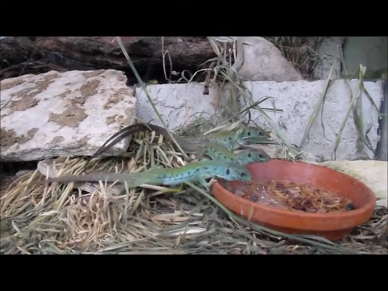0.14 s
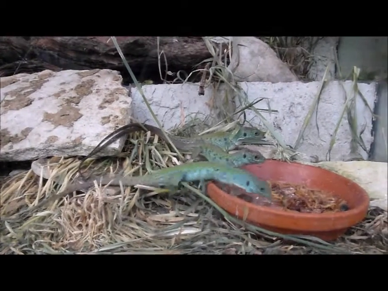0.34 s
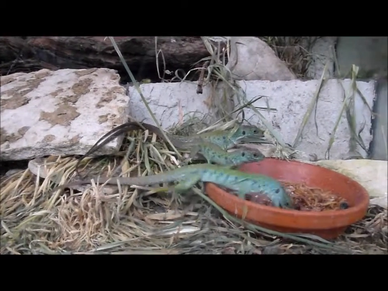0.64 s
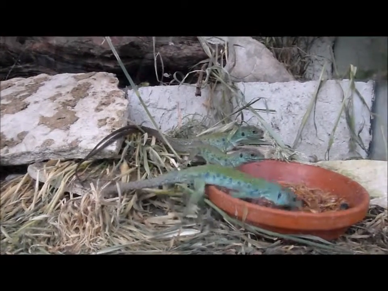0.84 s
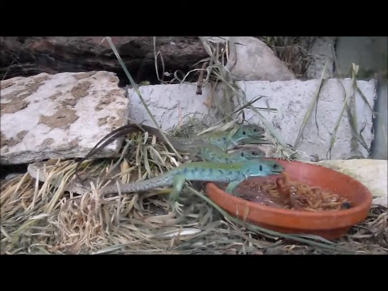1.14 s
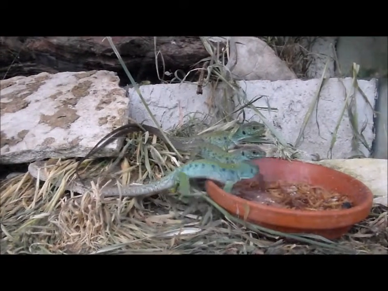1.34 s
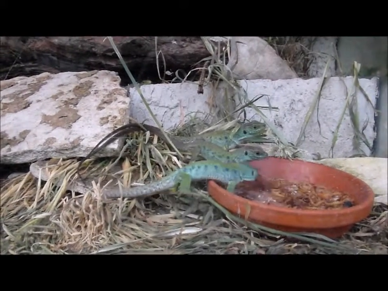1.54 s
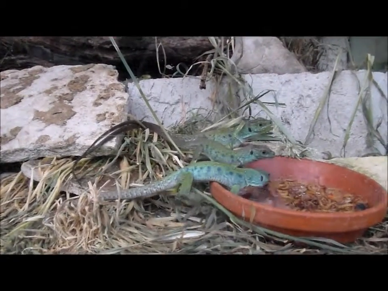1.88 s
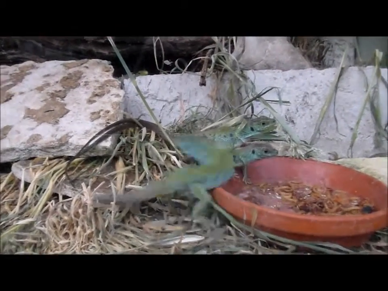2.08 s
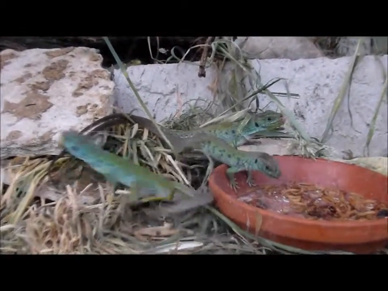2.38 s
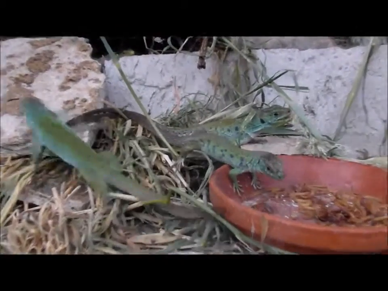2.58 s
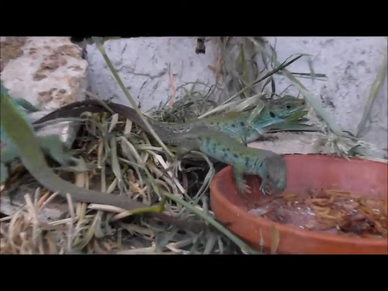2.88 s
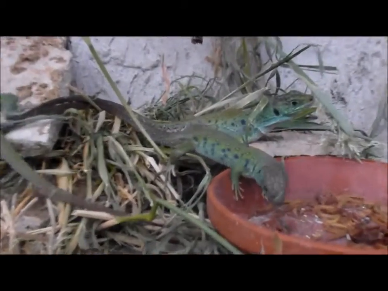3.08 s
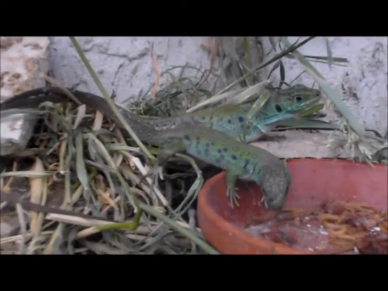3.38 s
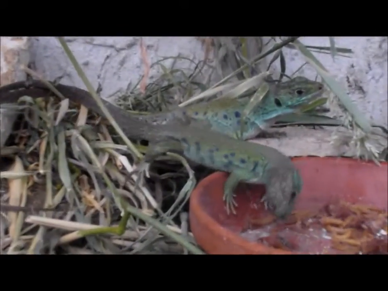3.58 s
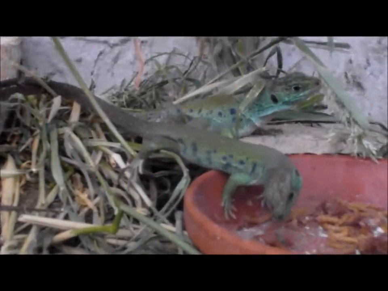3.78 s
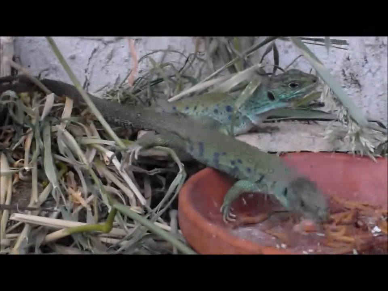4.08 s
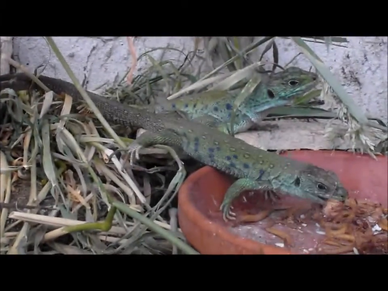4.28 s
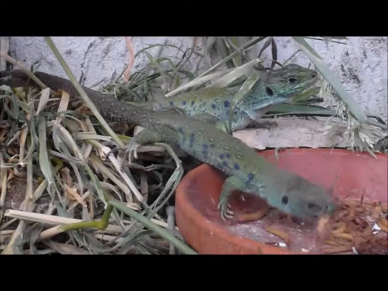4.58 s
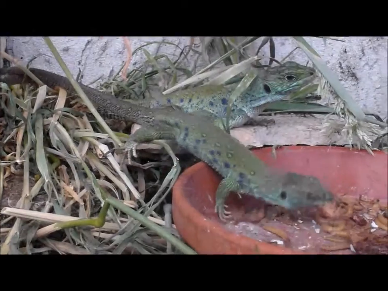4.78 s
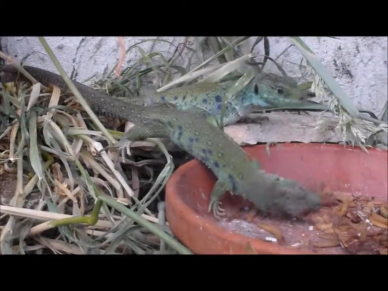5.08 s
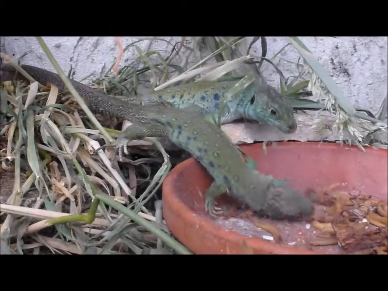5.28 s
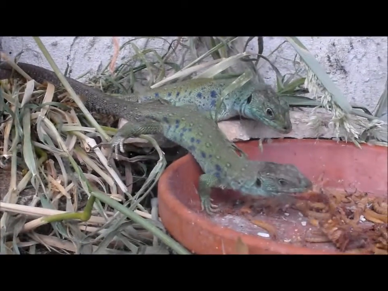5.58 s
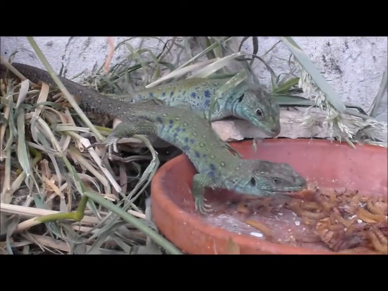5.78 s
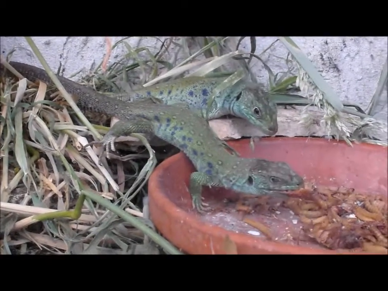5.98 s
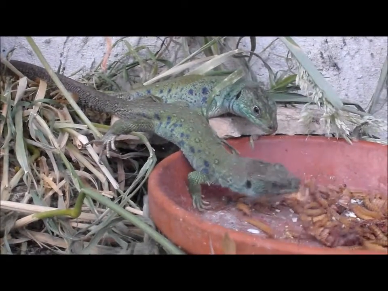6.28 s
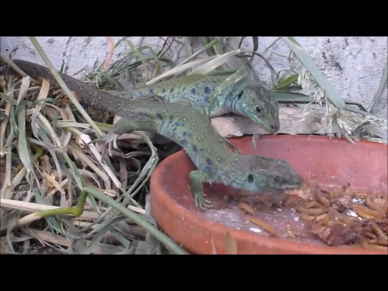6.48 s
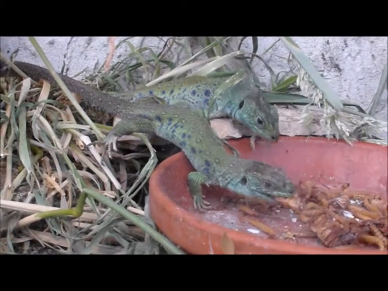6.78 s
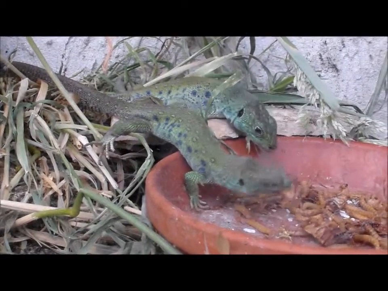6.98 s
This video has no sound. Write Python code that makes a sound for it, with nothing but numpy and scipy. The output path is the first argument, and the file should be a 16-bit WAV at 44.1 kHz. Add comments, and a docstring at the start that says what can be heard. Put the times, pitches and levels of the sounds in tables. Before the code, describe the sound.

Quiet outdoor pen: light sharp taps, a pause, one much louder click, a brief creak, then faint regular barks far away.

```python
"""A quiet outdoor pen: lizards feed from a clay dish close to a hand-held camera.
Sharp dry clicks and taps, ringing modes under a noisy crack, fall in two clusters, one far louder.
Soft puffs of grainy noise, some blurring the clicks, join them; a creak of stick-slip pulses follows.
Then something far off, probably a dog, barks steadily: a pitched, noisy drive through throat bands.
Shaped noise makes the low outdoor murmur and the faint hiss."""
import sys
import numpy as np
from scipy import signal
from scipy.fft import rfft, irfft
from scipy.io import wavfile
from scipy.ndimage import uniform_filter1d

SR = 44100
rng = np.random.default_rng(int(sys.argv[2]) if len(sys.argv) > 2 else 0)


def file_out(sig):
    """Save sig as 16-bit WAV at sys.argv[1]."""
    # one column per channel
    cols = np.atleast_2d(sig).T
    # limit, then scale
    lim = np.clip(cols, -1, 1)
    pcm = np.round(lim * 32767).astype(np.int16)
    wavfile.write(sys.argv[1], SR, pcm)


N = 315196
TIME = np.arange(N) / SR
EDGE_HZ = 11560  # upper band limit


def amp(db):
    """Decibels to gain."""
    return 10 ** (np.asarray(db) / 20)


def evened(x):
    """Scales to rms 1."""
    return x / np.sqrt(np.mean(x ** 2) + 1e-20)


def smooth_noise(size, width):
    """Slow random curve of rms 1: white noise averaged over width samples."""
    return evened(uniform_filter1d(rng.standard_normal(size), width))


def read(points, hz):
    """Reads a spectrum on a log-frequency axis."""
    point_hz, value = np.transpose(points)
    return np.interp(np.log(hz + 1), np.log(point_hz + 1), value)


def follow(rows, t, axis=1):
    """Reads one column of a curve at the times t."""
    rows = np.asarray(rows)
    return np.interp(t, rows[:, 0], rows[:, axis])


def coloured(x, gain):
    """Filters x by a gain that is a function of frequency."""
    size = x.shape[-1]
    return irfft(rfft(x) * gain(np.fft.rfftfreq(size, 1 / SR)), size)


def hump(centre_hz, octaves):
    """Bell-shaped gain around one frequency; octaves is its standard deviation."""
    return lambda hz: np.exp(-.5 * (np.log2((hz + 1) / centre_hz) / octaves) ** 2)


def bell(t, centre_s, width_s):
    """Bell-shaped envelope in time; width_s is its standard deviation."""
    return np.exp(-.5 * ((t - centre_s) / width_s) ** 2)


def sides(pan_db):
    """Left and right gains, pan_db apart, whose mean is 1."""
    left = np.atleast_1d(amp(pan_db))
    return np.array([left, np.ones_like(left)]) * 2 / (1 + left)


def add(mix, s, sound):
    """Mixes a stereo sound in at s seconds."""
    part = mix[:, max(round(s * SR), 0):][:, :sound.shape[1]]
    part += sound[:, :part.shape[1]]


def dying(noise, t60, t):
    """Lets each band of a noise die at its own speed from time 0 of t."""
    hz, frames, z = signal.stft(noise, SR, nperseg=256)
    fade = amp(-60 * np.maximum(frames + t[0], 0) / read(t60, hz)[:, None])
    return signal.istft(z * fade, SR, nperseg=256)[1][..., :len(t)]


def echoes(x, t60, likeness=0.7):
    """Diffuse outdoor tail: convolution with dying noise, scaled to energy 1 on the right."""
    t = np.arange(SR) / SR
    taps = rng.standard_normal((2, SR))
    taps[0] = likeness * taps[1] + np.sqrt(max(1 - likeness ** 2, 0)) * taps[0]
    tail = dying(taps, t60, t) * np.minimum(t / 0.0035, 1)
    return signal.fftconvolve(x, tail / np.linalg.norm(tail[1]), axes=1)[:, :N]


# microphone hiss spectrum: (frequency [Hz], relative density [dB])
HISS_SPECTRUM = [(30, -6.5), (300, -4), (1200, 3), (2000, 1.5), (3200, 1.5), (4500, -4.5), (6000, -6.5),
                 (9500, -8), (10300, -3), (11500, -4.5)]
# hiss before the common offset: (time [s], level outside 4-10 kHz [dB], gain of 4-10 kHz [dB])
HISS_CURVE = [(0, -72.5, -67), (2.6, -70, -69.5), (7.15, -74.5, -70.5)]
# stretches of dull hiss: (start [s], end [s])
DULL_STRETCHES = [(1.05, 1.314), (3.72, 6.025)]
DULL_DB, DULL_FADE_S = -8, 0.035


def hiss(level_db=3.0, rumble_db=-78):
    """Unrelated left/right hiss whose treble thins at times; a faint rumble swells as the camera moves."""
    spectrum = lambda hz: amp(read(HISS_SPECTRUM, hz)) * (hz < EDGE_HZ)
    noise = evened(coloured(rng.standard_normal((2, N)), spectrum))
    treble = coloured(noise, lambda hz: (hz > 4000) & (hz < 10000))
    dull = sum(np.clip(np.minimum(TIME - start, end - TIME) / DULL_FADE_S + .5, 0, 1)
               for start, end in DULL_STRETCHES)
    rest_gain = amp(follow(HISS_CURVE, TIME))
    treble_gain = amp(follow(HISS_CURVE, TIME, axis=2) + DULL_DB * dull)
    air = (noise - treble) * rest_gain + treble * treble_gain
    rumble = evened(coloured(rng.standard_normal((2, N)), hump(55, 0.51))) * bell(TIME, 2.1, 1.0)
    return amp(level_db) * air + amp(rumble_db) * rumble


# outdoor murmur spectrum: (frequency [Hz], relative density [dB])
MURMUR_SPECTRUM = [(25, -17), (100, -12.5), (200, -22.5), (320, -10), (430, -1), (660, 1), (850, -2),
                   (990, -3.5), (1090, -21.5), (2000, -37)]
# murmur before the offsets: (time [s], wash level [dB], low drone level [dB])
MURMUR_CURVE = [(0.0, -65.5, -82), (0.44, -65.5, -80.5), (0.75, -66, -68), (1.07, -64.5, -82),
                (1.59, -67, -80.5), (2.55, -62.5, -67), (3.6, -66.5, -80), (4.4, -63, -82.5),
                (4.76, -64.5, -74), (6.67, -66, -80), (6.85, -66, -70), (7.15, -66, -77)]
# murmur balance: (frequency [Hz], left minus right [dB])
MURMUR_BALANCE = [(60, -2.5), (150, -2), (350, -11.5), (650, -13.5), (1100, -9.5)]
# left-right likeness of the wash: (frequency [Hz], correlation [0-1])
MURMUR_LIKENESS = [(60, 0.71), (270, 1), (580, 0.3), (1200, .85)]


def murmur(drone_hz=280, drone_octaves=0.56, waver_db=0.5, wash_db=0.87, drone_db=2):
    """Far outdoor noise, mostly from the right, with a low noise drone that comes and goes."""
    common, other, drone_noise = rng.standard_normal((3, N))
    same = lambda hz: np.clip(read(MURMUR_LIKENESS, hz), 0, 1)
    unlike = lambda hz: np.sqrt(1 - same(hz) ** 2)
    pair = np.array([coloured(common, same) + coloured(other, unlike), common])
    wash = evened(coloured(pair, lambda hz: amp(read(MURMUR_SPECTRUM, hz))))
    wash = wash * amp(follow(MURMUR_CURVE, TIME) + wash_db)
    drone = evened(coloured(drone_noise, hump(drone_hz, drone_octaves)))
    drone = drone * amp(follow(MURMUR_CURVE, TIME, axis=2) + drone_db)
    waver = evened(coloured(rng.standard_normal(N), hump(4.8, 0.87)))
    wavering = (wash + drone) * amp(waver_db * waver)
    return coloured(wavering, lambda hz: sides(read(MURMUR_BALANCE, hz)))


# far barks: (peak time [s], level [dB], throat [Hz], lead-in [s], rasp against voice [dB])
FAR_BARKS = [(4.299, -63, 860, 0.049, -6.5), (4.612, -56, 887, 0.043, -15), (4.965, -57.5, 897, 0.052, -11),
             (5.368, -51, 926, .066, -16.5), (5.795, -60, 723, 0.061, -5.5), (6.207, -55, 860, 0.046, -9),
             (6.67, -62, 848, .04, -10), (7.125, -62, 1000, .03, -7.5)]
BARK_DB = -58  # ordinary bark
LEAD_DB, LEAD_SLOPE = -3, 0.55  # lead-in against an ordinary peak; its loss per dB of a louder peak
BOOM_DB, BOOM_SLOPE = -68, 0.76  # rolling echo of an ordinary bark; its gain per dB of a louder one


def barks(pitch_hz=470, rough=0.78, peak_s=0.01405, throat_octaves=0.28, tail_db=-4,
          boom_hz=280, boom_s=0.077, lead_rise_s=0.009, rasp_grain=0.42):
    """Each far bark leads in, peaks with a rasp as the mouth opens, and rolls away as a low echo."""
    out, boom = np.zeros((2, N)), np.zeros((2, N))
    t = np.arange(-SR // 8, SR // 4) / SR
    upper_throat = lambda hz: hump(3100, 0.26)(hz) + amp(3.0) * hump(1900, .4)(hz)
    for s, db, throat_hz, lead_s, rasp_db in FAR_BARKS:
        louder_db = db - BARK_DB
        opening = bell(t, 0, peak_s * np.where(t < 0, .6, 1.3))  # opens faster than it shuts
        bent_hz = pitch_hz * (1 + 0.1105 * opening + 0.0678 * smooth_noise(len(t), 150))
        turns = np.cumsum(bent_hz) / SR
        folds = evened(sum(np.cos(2 * np.pi * k * turns) for k in range(1, 10)))
        drive = (1 - rough) * folds + rough * rng.standard_normal(len(t))
        lead_in = np.clip((t + lead_s) / lead_rise_s + .5, 0, 1) * np.clip(-t / 0.018, 0, 1)
        lead_in = lead_in * amp(LEAD_DB - LEAD_SLOPE * louder_db)
        voice = evened(coloured(drive, hump(throat_hz, throat_octaves))) * np.maximum(opening, lead_in)
        grain = np.exp(rasp_grain * smooth_noise(len(t), 120))  # the rasp sputters
        rasp = amp(rasp_db) * evened(coloured(drive, upper_throat) * grain) * opening
        add(out, s + t[0], amp(db) * (sides(-2.9) * voice + sides(1.9) * rasp))
        roll = evened(coloured(rng.standard_normal(len(t)), hump(boom_hz, 0.74))) * bell(t, boom_s, 0.054)
        add(boom, s + t[0], sides(-8.5) * amp(BOOM_DB + BOOM_SLOPE * louder_db) * roll)
    return out + boom + amp(tail_db) * echoes(out, [(300, 1.0), (1000, 0.56), (3500, 0.35)])


# creak strength: (time [s], level [dB])
CREAK_CURVE = [(3.797, -60), (3.801, -52), (3.829, -62), (3.836, -43.5), (3.87, -51), (3.886, -42.5),
               (3.921, -44.5), (3.946, -61)]
# creak resonances: (frequency [Hz], width [Hz], relative level [dB])
CREAK_RESONANCES = [(690, 45, 13), (747, 87, 1), (828, 18.4, 10.5)]
SLIPS_PER_S = 162  # typical; jitter varies it


def creak(jitter=0.091, pan_db=-3.0, tail_db=-16, low_hz=620, high_hz=960):
    """Uneven stick-slip pulses knock on a few close resonances."""
    t = np.arange(CREAK_CURVE[0][0], CREAK_CURVE[-1][0], 1 / SR)
    rate = SLIPS_PER_S * np.exp(jitter * smooth_noise(len(t), 200))
    slips = np.diff(np.floor(np.cumsum(rate) / SR), prepend=-1)
    age = t - t[0]
    body = sum(amp(db) * np.exp(-np.pi * width_hz * age) * np.sin(2 * np.pi * hz * age)
               for hz, width_hz, db in CREAK_RESONANCES)
    band = signal.butter(4, [low_hz, high_hz], "bandpass", fs=SR, output="sos")
    rung = signal.sosfilt(band, signal.fftconvolve(slips, body)[:len(t)])
    out = np.zeros((2, N))
    add(out, t[0], sides(pan_db) * amp(follow(CREAK_CURVE, t)) * evened(rung))
    return out + amp(tail_db) * echoes(out, [(300, 1.0), (1500, 0.27)])


# soft low bumps and noise puffs, some as blur around clicks:
# (centre time [s], length [s], level before the swell [dB], centre [Hz])
SOFT_PUFFS = [(0.156, .22, -69.5, 7300), (0.595, .1, -71, 7000), (0.802, .07, -55, 4400),
              (.911, 0.013, -53.5, 110), (.971, .034, -56, 60), (1.329, .02, -48, 1900),
              (1.695, .05, -63, 2300), (1.754, .2, -65, 135), (3.428, .022, -46, 3000),
              (3.493, .058, -60, 2600), (3.85, .079, -70.5, 2690), (4.248, .12, -72.5, 3007)]
PUFF_OCTAVES = 0.77


def puffs(pan_db=-4, grain=0.57):
    """Soft puffs of noise, grainy from random sample weights, swell and fade."""
    out = np.zeros((2, N))
    for s, length_s, db, hz in SOFT_PUFFS:
        size = int(length_s * SR)
        grains = rng.standard_normal(size) * np.exp(grain * rng.standard_normal(size))
        puff = evened(coloured(grains, hump(hz, PUFF_OCTAVES))) * np.hanning(size)
        add(out, s - length_s / 2, sides(pan_db) * amp(db) * puff)
    return out


# edges of the click bands: [Hz]
BAND_EDGES_HZ = np.array([30, 350, 950, 1750, 2800, 4500, 7000, 11800])
BAND_CENTRES_HZ = np.sqrt(BAND_EDGES_HZ[1:] * BAND_EDGES_HZ[:-1])


def to_bands(x, band_db):
    """Equalises x towards the given level in each band, as mean square over 10 ms."""
    z, hz = rfft(x), np.fft.rfftfreq(len(x), 1 / SR)
    for _ in range(3):
        energy = np.histogram(hz, BAND_EDGES_HZ, weights=abs(z) ** 2)[0] * 2 / len(x)
        power = energy / (SR // 100)
        lift_db = np.array(band_db) - 10 * np.log10(power)
        z = z * amp(read(np.c_[BAND_CENTRES_HZ, lift_db], hz))
    return irfft(z, len(x))


BODY_RISE, TICK_RISE, TICK_FALL = 7.76, 6.5, 20  # skirts [dB/octave]; TICK_RISE is for a high tick
HIGH_TICK_HZ = 9100
THUD_DB = -28.5  # low thud of a blow, against its main ring


def click_colour(db, main_hz, dullness, tick_db, tick_hz):
    """Band levels: a body peaking at the main ring over a low thud, plus a tick, narrower when lower."""
    def peak(centre_hz, rise, fall):
        octaves = np.log2(BAND_CENTRES_HZ / centre_hz)
        return amp(np.minimum(rise * octaves, -fall * octaves))

    body = np.hypot(peak(main_hz, BODY_RISE, dullness), amp(THUD_DB) * (BAND_CENTRES_HZ < main_hz))
    tick = peak(tick_hz, TICK_RISE * HIGH_TICK_HZ / tick_hz, TICK_FALL)
    return 20 * np.log10(np.hypot(amp(db) * body, amp(tick_db) * tick))


# modes of the struck things: (frequency [Hz], relative level [dB], t60 before the ring factor [s])
STRUCK_MODES = [(350, -5.5, 0.014), (470, -12, 0.0047), (780, -2.5, 0.015), (1105, -11, 0.02),
                (1506, -6.5, 0.023), (1780, -17, .02), (1970, -3.5, 0.0088), (2308, -7, 0.019),
                (2570, -11.5, 0.024), (3428, 3, 0.005), (3640, -10, .012), (4183, -3, 0.01),
                (4363, -12.5, .012), (5010, -5.5, 0.017), (7180, -12.5, .014), (8605, -18, 0.016),
                (10200, -8, 0.019), (10300, -11.5, 0.0077), (11090, -10.5, 0.02)]
# ring-on of the surroundings: (frequency [Hz], t60 [s])
SURROUNDINGS_T60 = [(100, .15), (700, 0.16), (2500, 0.066), (5000, .14), (11000, 0.093)]
# left microphone port against right, near sounds: (frequency [Hz], phase [rad])
LEFT_PORT_PHASE = [(300, 0.44), (700, -0.98), (1400, -1.9), (2300, -0.99), (4200, -1.5), (6000, -2.5),
                   (11000, -1.3)]
TICK_PAN_DB = -7


def click(s, main_hz, ring, contact_s, tail_db, body_pan_db, band_db,
          main_db=1, main_t60=.014, crack_db=-4, crack_s=.0017, slide_db=-4, catch=.75, lumpy=.3):
    """A contact slides with a bright scratch, then catches: short modes ring under a noisy crack."""
    t = np.arange(-SR // 100, SR // 5 - SR // 100) / SR
    age = np.maximum(t - catch * contact_s, 0)
    build = np.minimum(age / contact_s, 1)  # the ring builds while the contact lasts
    free = np.maximum(age - contact_s, 0)  # and then dies
    modes = [(main_hz, main_db, main_t60)] + STRUCK_MODES
    signs = [1] + [(-1) ** k for k in range(len(STRUCK_MODES))]  # listed modes alternate in sign
    body = sum(sign * amp(db) * np.exp(-np.log(1000) * free / (t60 * ring)) * np.sin(2 * np.pi * hz * age)
               for sign, (hz, db, t60) in zip(signs, modes))
    grit, scratch, scatter = rng.standard_normal((3, len(t)))
    crack = amp(crack_db) * grit * np.exp(-free / (crack_s * ring))
    slide = evened(coloured(scratch, hump(10500, 0.91))) * np.exp(-(t / contact_s - 1) ** 2 / 4.0)
    direct = to_bands((body + crack) * build + amp(slide_db) * slide, band_db)
    scatter = scatter * np.exp(lumpy * smooth_noise(len(t), 130))  # reflections come in clumps
    tail = dying(scatter, SURROUNDINGS_T60, t) * np.clip(t / 0.0037, 0, 1)
    right = direct + to_bands(tail, band_db + tail_db)
    pan = [(3500, body_pan_db), (4500, TICK_PAN_DB)]
    port = lambda hz: amp(read(pan, hz)) * np.exp(1j * read(LEFT_PORT_PHASE, hz))
    return s + t[0], np.array([coloured(right, port), right])


# clicks and taps: (time [s], level [dB], main ring [Hz], ring length [factor], contact [s],
# dullness [dB/octave], tick level [dB], tick [Hz], left minus right of the body [dB])
CLICKS_AND_TAPS = [(0.7233, -45, 640, 0.96, 0.00055, 13, -51.5, 8900, -16),
                   (.738, -47.5, 1300, 0.82, .00028, 12, -66, 9100, -18),
                   (0.7853, -49, 517, 1.2, 0.00039, 4, -69, 9100, -17),
                   (.7983, -32, 1325, 0.96, .00058, 7, -27.5, 5640, -14.5),
                   (0.9057, -51, 1210, .8, .0005, 7, -61, 9100, -16),
                   (.911, -33, 677, .38, .00027, 9.5, -44, 8900, -23),
                   (1.031, -43, 1370, 0.88, 0.00038, 34, -66, 9100, -19),
                   (1.0915, -50.5, 618, 2.2, .00057, 9, -82, 9100, -16),
                   (1.1925, -48.5, 530, 1.5, .00044, 15, -79, 9100, -14),
                   (1.325, -38, 912, 2.5, 0.0016, 10.5, -76, 9100, -1),
                   (1.3289, -36.5, 425, 1.2, 0.0012, 7, -82, 9100, -10),
                   (1.6551, -34, 1660, 0.63, .0012, 35, -53, 9100, -9),
                   (1.6713, -36, 2220, 0.57, .0011, 15.5, -60, 9100, -4.5),
                   (3.3864, -47.5, 1220, 1, 0.001, 22, -59, 9100, -12.5),
                   (3.3967, -46, 1196, .9, .00063, 6, -49, 9100, -9),
                   (3.4106, -42.5, 1530, 2, 0.0011, 18, -58, 9100, -10.5),
                   (3.417, -44, 1484, 1.4, 0.00032, 28, -51, 9100, -7),
                   (3.4246, -39.5, 1220, 1.4, 0.0017, 8, -46, 9100, -2.5),
                   (3.4323, -48, 1607, .9, .0011, 10.5, -23, 9900, -3.5),
                   (3.4322, -17.5, 2033, 1.08, .0015, 16, -15.5, 3400, -2),
                   (3.4377, -37, 1900, .6, .0004, 5, -32.5, 9103, -4)]
ORDINARY_DB = -42
TAIL_DB, TAIL_SLOPE = -9, 0.28  # scatter at ordinary strength; its loss per dB of a louder click


def clicks():
    """Clicks and taps, each with short scatter from stones and walls nearby; louder ones are drier."""
    out = np.zeros((2, N))
    for s, db, main_hz, ring, contact_s, dullness, tick_db, tick_hz, pan_db in CLICKS_AND_TAPS:
        band_db = click_colour(db, main_hz, dullness, tick_db, tick_hz)
        tail_db = TAIL_DB - TAIL_SLOPE * (band_db.max() - ORDINARY_DB)
        add(out, *click(s, main_hz, ring, contact_s, tail_db, pan_db, band_db))
    return out


def scene():
    """Background, far barks, then the near creak, puffs and clicks."""
    return hiss() + murmur() + barks() + creak() + puffs() + clicks()


def record(dry, ceiling=0.93):
    """Rounds off the loudest peaks, then limits the band."""
    limited = ceiling * np.tanh(dry / ceiling)
    lowpass = signal.firwin(301, EDGE_HZ, window=("kaiser", 8), fs=SR)
    return signal.oaconvolve(limited, lowpass[None], "same")


dry = scene()
out = record(dry)
file_out(out)
```